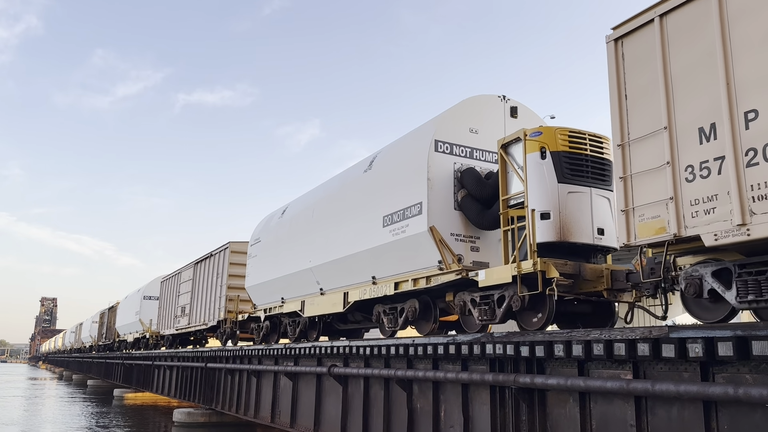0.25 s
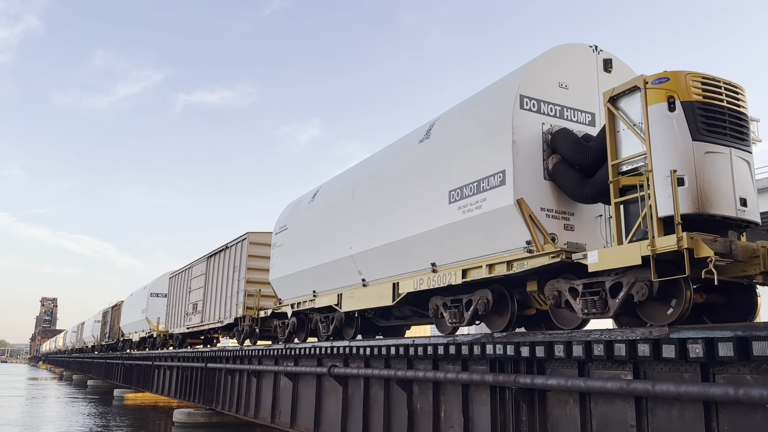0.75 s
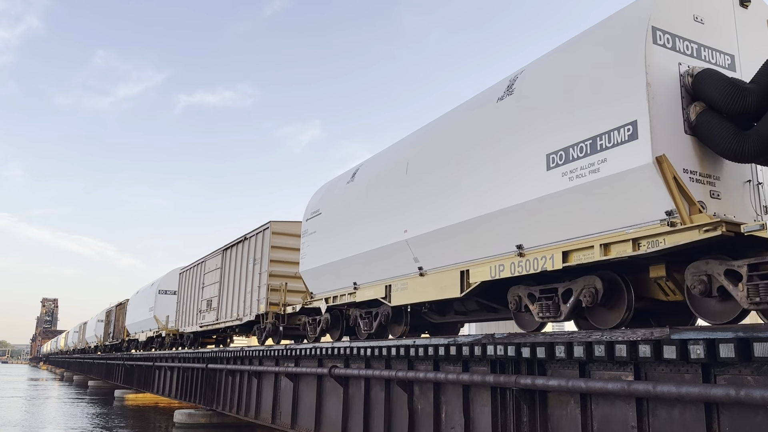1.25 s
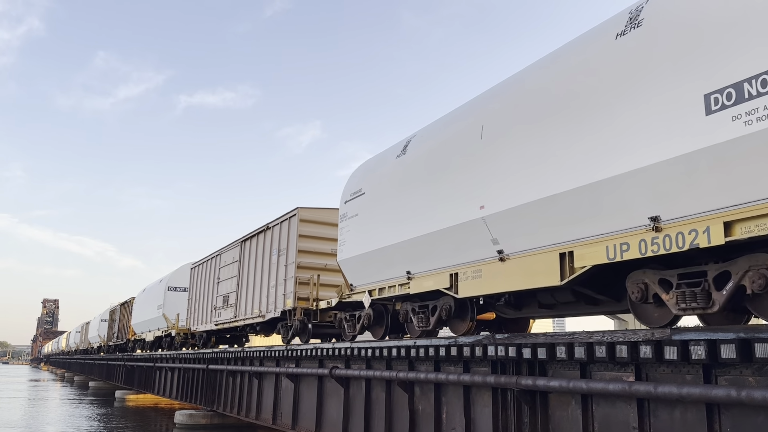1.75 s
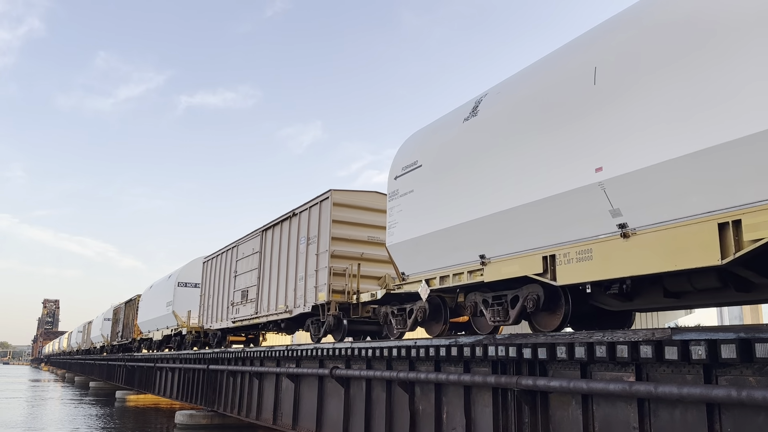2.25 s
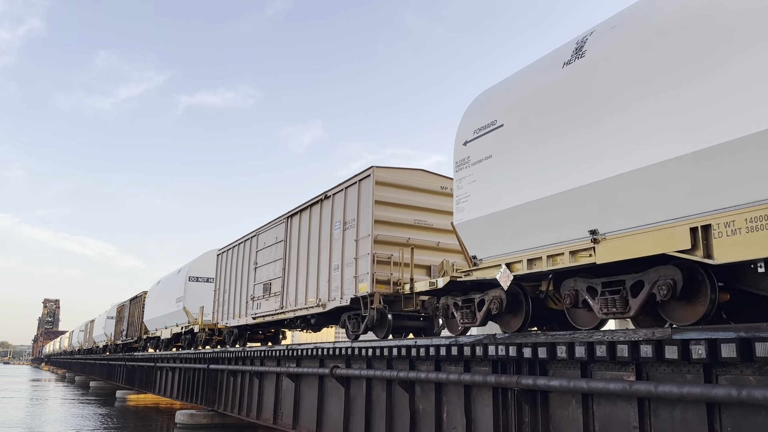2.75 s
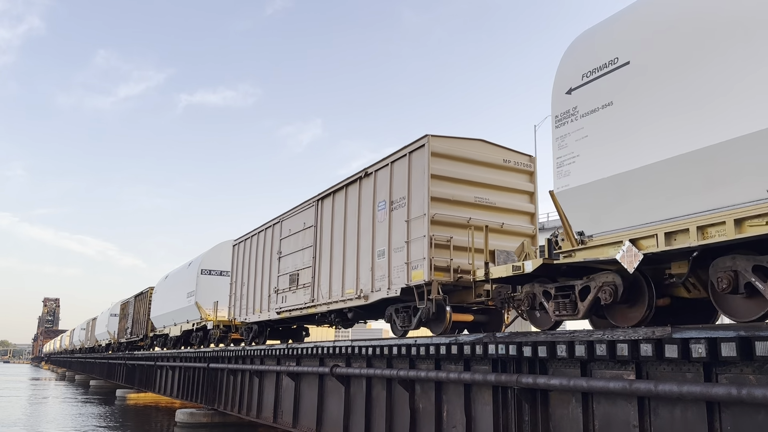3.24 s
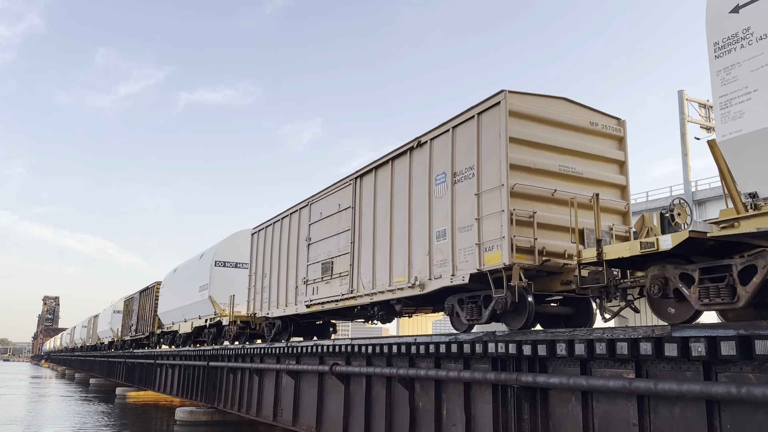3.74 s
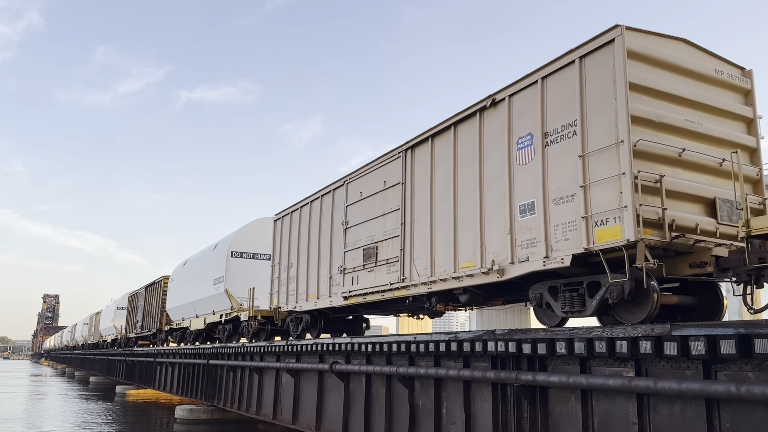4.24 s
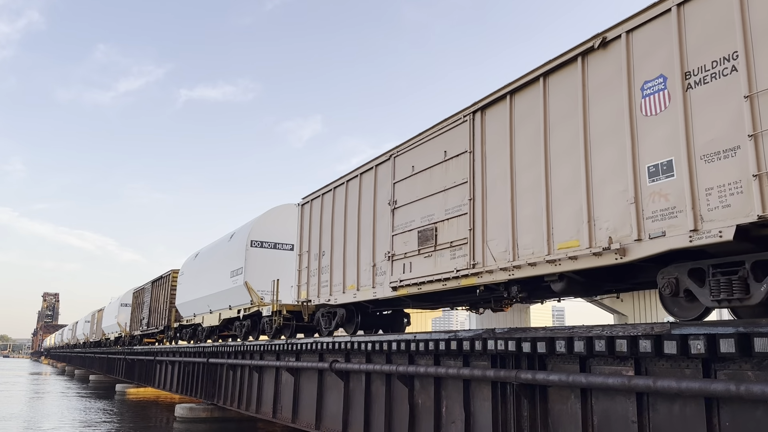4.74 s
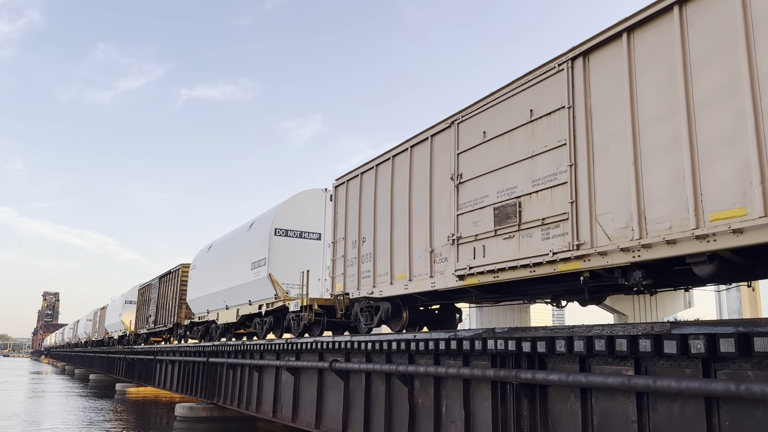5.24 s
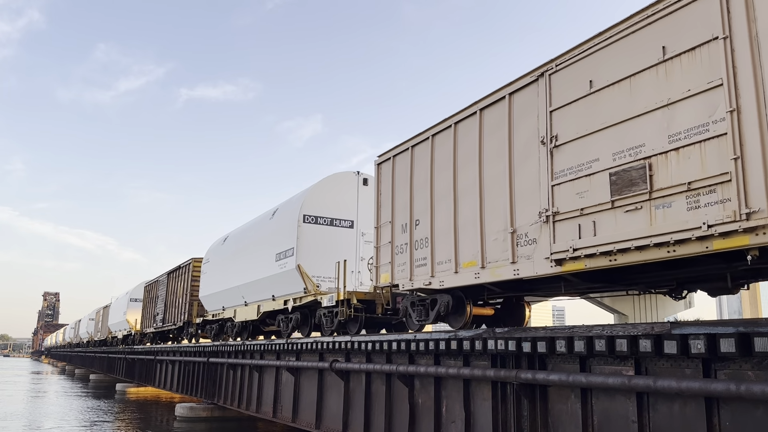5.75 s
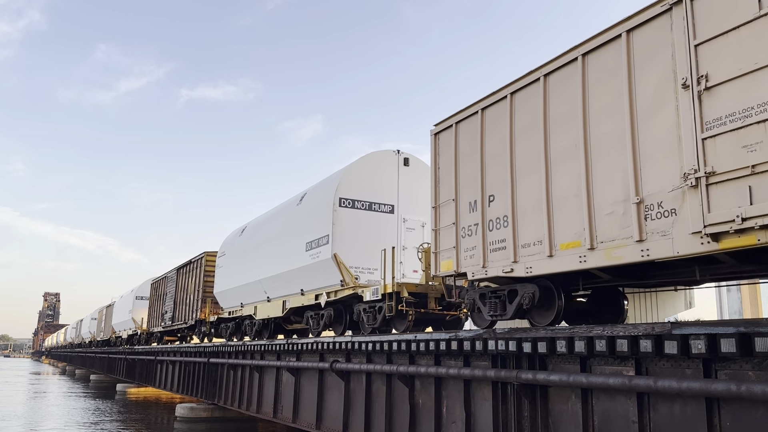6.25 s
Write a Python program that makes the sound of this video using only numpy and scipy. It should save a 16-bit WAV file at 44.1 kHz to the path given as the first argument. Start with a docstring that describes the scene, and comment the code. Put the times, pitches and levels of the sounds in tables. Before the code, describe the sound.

Outdoors beside water, just below the deck of a steel bridge, a freight train passes close to a stereo microphone. Deep girder boom swells irregularly under a continuous rough wheel roar. A hissing scrape pulses almost twice a second. Gritty flange bites and short, high ringing squeals cluster in the first two and a half seconds; later the scrape stands out more, with a few dull knocks.

```python
"""Train on a girder bridge

A freight train rolls across a steel girder bridge, heard from the bank just below the deck.
Filtered noise makes the boom of the girders, its swells and the dull knocks; filtered random impacts
make the roar of rough treads, the hum of wheel webs, a steady hiss and a scrape once a turn.
Flange bites add grit and drive decaying modes of the wheel disc; brief wavering sines squeal."""
import sys
import numpy as np
from scipy import signal
from scipy.fft import rfft, irfft, next_fast_len
from scipy.io import wavfile
from scipy.ndimage import uniform_filter1d, map_coordinates

SR = 44100
rng = np.random.default_rng(int(sys.argv[2]) if len(sys.argv) > 2 else 0)


def dump(signal):
    """Clip the signal to [-1, 1] and save it as 16-bit WAV at the path in sys.argv[1]."""
    limited = np.clip(np.atleast_2d(signal).T, -1, 1)
    pcm = np.round(limited * 32767).astype(np.int16)
    wavfile.write(sys.argv[1], SR, pcm)


N = 286201
TIME = np.arange(N) / SR
# frequency grid in Hz, kept above zero for logarithms, with room for ringing after the end
HZ = np.maximum(np.fft.rfftfreq(next_fast_len(N + SR // 10, True), 1 / SR), 1)

# All levels in the tables are relative; each spectrum is scaled to unit power when used.
# Passage of the nearest bogies: t/s, lag of the left/ms, left over right/dB
BOGIE_PASSAGE = [(0, -0.054, 0.5), (2.9, -0.024, 0.15), (3.7, 0.1, 0.1), (4.9, 0.31, 0.6),
                 (6.49, 0.37, 1.1)]
# Slow change as the cars go by: t/s, steady girder boom level/dB, deck rumble level/dB
BRIDGE_LOAD = [(0, -14.5, -16), (.7, -11.5, -14.5), (2.3, -13, -14), (3.2, -15, -14), (4.7, -15.5, -14.5),
               (5.8, -18, -17), (6.49, -17, -17)]
# Swells of the low boom: t of crest/s, level/dB, width at half power/s
BOOM_SWELLS = [(0.166, -6.5, 0.067), (.28, -5, 0.065), (0.755, -16, 0.037), (0.823, -11, 0.022),
               (0.907, -6.5, 0.042), (1.143, -7.5, .06), (1.24, -9, .04), (1.307, -8, .035),
               (1.506, -6.5, 0.05), (1.797, -7, 0.055), (2.097, -7.5, 0.13), (2.264, -8.5, .05),
               (2.438, -8, 0.097), (2.616, -7.5, 0.045), (2.722, -7.5, 0.046), (2.92, -13, .04),
               (3.018, -18, 0.04), (3.53, -11, .06), (3.61, -7.5, 0.044), (3.992, -11, .08),
               (4.1, -10, .045), (4.33, -8, .055), (4.42, -10, 0.039), (4.568, -12, 0.06),
               (4.807, -10.5, .05), (5, -12, 0.055), (5.16, -7, 0.036), (5.375, -9.5, 0.038),
               (5.484, -5, 0.037), (5.596, -6, .04), (6.022, -7, 0.031), (6.153, -9, .045),
               (6.235, -9.5, 0.026), (6.48, -8.5, .06)]
# Turns of the scraping wheel: start t/s, rise/s, scrape level/dB, sizzle level/dB, tread roar level/dB
WHEEL_TURNS = [(-.1, 0.083, -37, -39, -26.5), (.44, 0.17, -36, -36, -25), (.925, 0.14, -37, -36.5, -27),
               (1.53, 0.05, -34.5, -33.5, -25), (2.04, 0.12, -33, -34, -23), (2.56, 0.14, -34, -36, -21),
               (3.122, 0.058, -32, -35, -23), (3.663, 0.031, -31.5, -34, -22),
               (4.194, .08, -33, -37.5, -23.5), (4.713, 0.13, -34, -38.5, -21.5),
               (5.288, 0.13, -34.5, -42, -25), (5.83, 0.17, -34.5, -49.5, -31.5),
               (6.39, 0.2, -30, -31, -28)]
# How clearly this wheel stands out of the train's noise: t/s, share of the full dip [0 to 1]
PROMINENCE = [(0, 0.5), (.95, 0.41), (1.5, 0.62), (3.1, 0.92), (4.7, 0.69), (6.49, 0.72)]
# Two resonances of the passing wheel webs: t/s, lower hum level/dB, upper hum level/dB
WEB_HUM = [(0, -38, -42), (1.2, -38, -42), (2.4, -34, -42), (3.9, -33, -40), (5.5, -38, -35.5),
           (6.49, -37.5, -42)]
# Brief rasps of the wheel webs: t of crest/s, lift of the lower hum/dB, lift of the upper hum/dB
WEB_RASPS = [(2.23, 5, -8), (2.36, 6, 1), (2.86, 6, 6), (5.55, 4, 7.5), (5.9, 5, 2), (6.09, 4, 7)]
# Slow level of the highest hiss: t/s, level against sizzle/dB
HISS_LEVEL = [(0, -26), (.7, -19), (2.2, -13), (3, -9.5), (4.9, -9.5), (5.9, -17), (6.49, -16)]
# Background hiss near 3 kHz through the whole passage: t/s, level/dB
BACKGROUND_HISS = [(0, -35.5), (1.3, -38.5), (2.3, -35), (3.2, -38), (5, -47), (6.49, -37.5)]
# Flange bites: start t/s, grit level/dB, drive of the high modes/dB, drive of the low modes/dB
FLANGE_BITES = [(0.622, -21, -29, -33), (0.655, -23, -36, -44), (0.688, -14.5, -35, -32),
                (0.918, -29, -37, -35), (0.9614, -23, -35, -42), (1.098, -20.5, -35, -44),
                (1.1444, -26, -39, -43), (1.19, -29, -36, -43), (1.287, -32, -34, -53),
                (1.41, -24, -47, -55), (1.556, -14.5, -30, -35), (1.59, -19, -38, -42),
                (1.69, -15.5, -40, -46), (1.9, -24, -36, -55), (2.147, -33, -46, -44),
                (2.245, -21, -30, -48), (2.29, -22, -37, -44), (2.33, -20, -35, -42),
                (2.777, -19, -41, -45), (4.46, -23, -45, -37), (4.95, -25, -53, -41),
                (6.363, -28, -48, -60), (6.42, -31, -53, -37)]
# Modes of the wheel disc: f/Hz, level/dB, time to decay by 60 dB/s
DISC_MODES = [(1735, 0, .4), (4716, -6.5, .45), (5518, -4, .45), (6352, -1, .5), (6860, -9, .3),
              (7252, -5, .18), (8187, -3, .2), (9160, -7.5, .12), (10155, -6, .18), (10390, -12, .15),
              (11241, -13, .22), (12383, -16.5, .17), (13595, -19, .1), (14798, -14.5, .12)]
# Squealing tones: start t/s, f/Hz, level/dB, time before the decay/s
SQUEAL_TONES = [(.64, 7252, -35, .02), (.685, 7252, -29, .03), (.685, 6352, -29, .05),
                (.69, 9160, -29, .02), (.7, 14798, -42, .03), (.72, 8187, -36, .04), (.93, 8187, -32, .065),
                (.96, 14798, -48, .05), (.965, 6352, -39, .035), (.97, 5518, -40, .05),
                (1.1, 8187, -33, .035), (1.115, 6352, -42, .02), (1.12, 10155, -43, .06),
                (1.14, 7252, -35, .03), (1.17, 5518, -38, .06), (1.17, 8187, -31, .07),
                (1.285, 8187, -40, .04), (1.415, 8187, -35, .03), (1.56, 8187, -27, .028),
                (1.575, 6352, -37, .03), (1.9, 8187, -37, .06), (2.015, 7252, -42, .022),
                (2.165, 7490, -36, .02), (2.25, 8187, -35, .04), (2.315, 7252, -34, .03),
                (2.335, 10155, -39, .03), (2.67, 8187, -43, .03), (4.09, 6800, -42, .03),
                (4.378, 10290, -45, .025), (4.44, 10290, -36, .035), (5.012, 10250, -45, .025),
                (6.228, 8480, -45, .02), (6.29, 9170, -48, .12), (6.425, 8187, -44, .03)]
# Dull knocks of wheels on the track: t/s, level/dB
TRACK_KNOCKS = [(3.054, -19), (4.579, -17), (4.922, -19), (5.37, -18.5)]

# Spectrum of the lowest girder resonance: f/Hz, level per Hz/dB
GIRDER_SPECTRUM = [(15, -47), (30, -40), (40, -16), (48, -4.5), (55, 7), (61, 7.5), (67, -0.5), (76, -11.5),
                   (110, -36)]
# Spectrum of the deck plates: f/Hz, level per Hz/dB
DECK_SPECTRUM = [(50, -18), (68, 2), (80, -1), (105, 0), (122, -4), (145, -2.5), (200, -7), (225, -10.5),
                 (300, -13), (380, -15), (550, -24.5), (1200, -34)]
# Spectrum of rough treads on the rail: f/Hz, level per Hz/dB
TREAD_SPECTRUM = [(150, -4), (260, 5.5), (360, 5), (460, -0.5), (650, 0.5), (900, -7), (1120, -7.5),
                  (1300, -15), (1700, -15.5), (2300, -34), (3800, -48)]
# Spectrum of the lower web resonance: f/Hz, level per Hz/dB
LOWER_WEB_SPECTRUM = [(1200, -16.5), (1450, -2), (1720, 1), (1950, -1), (2200, -23)]
# Spectrum of the upper web resonance: f/Hz, level per Hz/dB
UPPER_WEB_SPECTRUM = [(1750, -22), (2050, 0.5), (2270, -1), (2500, -4.5), (2800, -10.5), (3300, -28)]
# Spectrum of the scraping wheel: f/Hz, level per Hz/dB
SCRAPE_SPECTRUM = [(1200, 4), (1800, 3.5), (2700, 1), (3700, 3), (4700, 4), (5500, 5), (6200, 1), (7200, 1),
                   (9000, -9.5), (10300, -21), (11300, -41), (16000, -26)]
# Spectrum of the sizzle: f/Hz, level per Hz/dB
SIZZLE_SPECTRUM = [(4000, -15), (6500, -17.5), (7500, -4), (8500, -3.5), (9200, 1), (10100, -4.5),
                   (10900, -12.5), (12200, -25), (14300, -16), (15700, -27)]
# Spectrum of the highest hiss: f/Hz, level per Hz/dB
TOP_HISS_SPECTRUM = [(10000, -20), (11200, 1), (12500, -1), (14000, -5), (15700, -5)]
# Spectrum of the rail hiss near 3 kHz: f/Hz, level per Hz/dB
RAIL_SPECTRUM = [(2200, -7.5), (2600, -2), (2900, -5), (3300, -3.5), (3700, -21)]
# Spectrum of the flange grinding on the rail head: f/Hz, level per Hz/dB
BITE_SPECTRUM = [(3500, -32), (6000, -1), (7300, 10), (8300, 13), (9400, 13.5), (10800, 7.5), (12500, -3),
                 (14800, 2), (16000, -7)]
# Spectrum of a knock: f/Hz, level per Hz/dB
KNOCK_SPECTRUM = [(150, -6), (330, 7), (650, -5), (1100, -14), (2000, -19), (3000, -21)]
# Likeness of left and right: f/Hz, correlation [0 to 1]
LIKENESS = [(80, 1), (200, 0.965), (600, 0.82), (1300, 0.62), (2300, 0.36), (4500, 0.32), (6000, 0.22),
            (7200, 0.65), (8300, 0.9), (11500, 1), (15000, 1)]
# Microphone ports: f/Hz, left level/dB, right level/dB, phase lag of the right/rad
PORTS = [(60, 0.5, -0.5, 0), (200, 0.8, -0.5, 0), (600, 0.8, 1.1, 0), (1300, 1.6, 2.0, 0),
         (2300, 0.9, 4.4, 1.8), (3200, 3.9, 0.5, 1.0), (4500, 4.4, -2.3, 1.0), (6000, 6.0, -4.2, 2.2),
         (7200, 6.4, 0.2, 2.0), (8300, 8.2, 4.6, 2.3), (9700, 2.4, 1.7, 1.3), (11500, -0.0, 0.0, 0.0),
         (15000, 3.3, 3.3, -1.7)]

PLATE_RIPPLE_DB, PLATE_MODE_HZ = 1.3, 22   # spread and spacing of the plate modes
RELEASE_AFTER_S, RELEASE_S = 0.32, 0.18   # the wheel bears on this long in each turn, then eases off
EASING = 1.1   # exponent; above 1 rounds the shoulders of each swell
# full dip of each sound while the wheel is eased off, before its prominence is applied
SCRAPE_DIP_DB, SIZZLE_DIP_DB, ROAR_DIP_DB = 10.5, 13, 7
DECK_DIP_DB, WEB_DIP_DB, RAIL_DIP_DB = 2, 8.5, 7.5
RASP_S = 0.033   # width of a rasp at half its lift in dB
RASP_DB, RASPS_PER_S = 1.44, 25   # uneven grip makes the web hum rasp
BITE_S = 0.03   # time scale on which a bite lets go
TURNS_PER_S, HZ_PER_LOBE, LOBE_DEPTH = 1.87, 650, .5   # lobes of each mode sweep past, so it beats
SQUEAL_RISE_S, SQUEAL_RING_CYCLES = .007, 1000   # a squeal dies by 60 dB in this many cycles
SQUEAL_WOBBLE_HZ, SQUEAL_FLUTTER_DB, SQUEAL_DB = 38, 2.6, -2.5   # pitch and level spread, overall gain
KNOCK_T60_S = .06
PATCH_DB, PATCH_HZ, PATCH_S = 1.3, 110, .025   # depth, width and life of a patch of resonance
CUTOFF_HZ = 16100


def from_db(db):
    """Logarithmic measure: decibels to amplitude gain."""
    return 10 ** (np.asarray(db) / 20)


def rms_one(x):
    """Normalization: scale to unit mean power."""
    return x / np.sqrt(np.mean(x ** 2) + 1e-20)


def in_time(rows):
    """Linear interpolation: the columns of a curve at every sample."""
    s, *columns = np.transpose(rows)
    return [np.interp(TIME, s, column) for column in columns]


def in_hz(rows):
    """Interpolation along log frequency: the columns of a spectrum at every frequency."""
    hz, *columns = np.transpose(rows)
    return [np.interp(np.log(HZ), np.log(hz), column) for column in columns]


def drift(rate):
    """Slow random modulation: chance values about rate times a second, joined by lines; RMS 1."""
    knots = rng.standard_normal(2048)
    return rms_one(np.interp(TIME * rate, np.arange(len(knots)), knots))


def bell(s, length):
    """Gaussian envelope: a hump of height 1 around s; length is its width at half height."""
    hump = np.zeros(N)
    near = slice(*np.searchsorted(TIME, [s - 2 * length, s + 2 * length]))
    hump[near] = .5 ** ((2 * (TIME[near] - s) / length) ** 2)
    return hump


def steady(x, span_s):
    """Envelope normalization: even out the level and keep the wandering phase."""
    analytic = signal.hilbert(x, next_fast_len(N))[:, :N]
    power = np.mean(np.abs(analytic) ** 2, axis=0) / 2
    return x / np.sqrt(np.abs(uniform_filter1d(power, max(int(span_s * SR), 1))) + 1e-12)


def padded_fft(x):
    """Fourier analysis: spectrum on the HZ grid, with room for ringing after the end."""
    return rfft(x, 2 * (len(HZ) - 1))


def contacts(per_s, spread_db):
    """Shot noise: two unrelated streams of tiny steel-on-steel impacts of uneven size."""
    sizes = from_db(spread_db * np.minimum(rng.exponential(1, (2, N)), 4))
    hits = rng.random((2, N)) < per_s / SR
    return rms_one(hits * sizes * rng.choice([-1, 1], (2, N)))


def radiate(force, spectrum):
    """Resonant radiation: a steel body colours two force streams, which are then given their stereo
    correlation."""
    alike = np.clip(in_hz(LIKENESS)[0], 0, 1)
    roll_off = np.minimum(spectrum[-1][0] / HZ, 1) ** 4
    # above the girder's few low modes, crowded plate modes leave small peaks and dips
    modes_hz = np.arange(0, SR, PLATE_MODE_HZ)
    peaks = rng.standard_normal(len(modes_hz)) * (modes_hz > 250)
    ripple_db = PLATE_RIPPLE_DB * np.interp(HZ, modes_hz, peaks)
    mid, side = padded_fft(force) * from_db(in_hz(spectrum)[0] + ripple_db) * roll_off
    stereo = np.sqrt(1 + alike) * mid + np.sqrt(1 - alike) * side * [[1], [-1]]
    return rms_one(irfft(stereo)[:, :N])


def wheel_turns():
    """Periodic contact load: once a turn the wheel bears on, holds and eases off.

    Returns slack (0 = full grip), then the scrape, sizzle and roar levels in dB."""
    starts, rises, *levels_db = np.transpose(WHEEL_TURNS)
    release_end = RELEASE_AFTER_S + RELEASE_S
    presses = []
    for s, rise in zip(starts, rises):
        ages = [0, min(rise, RELEASE_AFTER_S), RELEASE_AFTER_S, release_end]
        presses.append(np.interp(TIME - s, ages, [0, 1, 1, 0]))
    pressure = np.max(presses, axis=0)
    slack = (1 - pressure) ** EASING * in_time(PROMINENCE)[0]
    middles = starts + release_end / 2
    dips_db = SCRAPE_DIP_DB, SIZZLE_DIP_DB, ROAR_DIP_DB
    return slack, *[np.interp(TIME, middles, db) - dip_db * slack for db, dip_db in zip(levels_db, dips_db)]


def girders(gain_db, swell_db, span_s):
    """Narrow-band resonance: the girders throb in a low mode, swells adding in power to the boom."""
    boom_db, _ = in_time(BRIDGE_LOAD)
    swells = sum(from_db(db + swell_db) ** 2 * bell(s, length) for s, db, length in BOOM_SWELLS)
    level = np.sqrt(from_db(boom_db + gain_db) ** 2 + swells)
    throb = level * steady(radiate(rng.standard_normal((2, N)), GIRDER_SPECTRUM), span_s)
    return signal.sosfilt(signal.butter(3, 33, "high", fs=SR, output="sos"), throb)


def rolling(slack, roar_db, deck_gain_db, roar_gain_db, lower_gain_db, upper_gain_db):
    """Roughness excitation: rough treads shake the deck, roar from the rail and hum in the wheel webs."""
    deck_db = in_time(BRIDGE_LOAD)[1] - DECK_DIP_DB * slack
    lifts_db = sum(np.outer(db, bell(s, RASP_S)) for s, *db in WEB_RASPS)
    lower_db, upper_db = in_time(WEB_HUM) + lifts_db - WEB_DIP_DB * slack
    plates = steady(radiate(rng.standard_normal((2, N)), DECK_SPECTRUM), span_s=0.08)
    deck = from_db(deck_db + deck_gain_db) * plates
    roar = steady(radiate(contacts(per_s=5000, spread_db=2.5), TREAD_SPECTRUM), span_s=0.073)
    tread = from_db(roar_db + roar_gain_db) * roar
    lower_hum = radiate(contacts(per_s=4000, spread_db=3.0), LOWER_WEB_SPECTRUM)
    lower = from_db(lower_db + lower_gain_db) * lower_hum
    upper_hum = radiate(contacts(per_s=4000, spread_db=1.5), UPPER_WEB_SPECTRUM)
    upper = from_db(upper_db + upper_gain_db) * upper_hum
    rasp = from_db(RASP_DB * drift(RASPS_PER_S))
    left, right = deck + tread + rasp * (lower + upper)
    lag_ms, _ = in_time(BOGIE_PASSAGE)
    return np.array([np.interp(TIME - lag_ms / 1000, TIME, left), right])


def scrape(scrape_db, sizzle_db, scrape_gain_db, sizzle_gain_db, chatter_db):
    """Stick-slip friction: grains, sizzle and top hiss swell with each turn at levels of their own."""
    chatter = from_db(chatter_db * drift(120))
    grains = radiate(contacts(per_s=15000, spread_db=1.0), SCRAPE_SPECTRUM)
    body = from_db(scrape_db + scrape_gain_db) * grains
    bright = radiate(contacts(per_s=15000, spread_db=-0.5), SIZZLE_SPECTRUM)
    sizzle = from_db(sizzle_db + sizzle_gain_db) * bright
    top = radiate(contacts(per_s=5000, spread_db=-2.0), TOP_HISS_SPECTRUM)
    hiss = from_db(sizzle_db + sizzle_gain_db + in_time(HISS_LEVEL)[0]) * top
    return chatter * (body + sizzle + hiss)


def rail(slack):
    """Structure-borne sound: rolling contact carried along the rail as a narrow background hiss."""
    level_db, = in_time(BACKGROUND_HISS)
    hiss = radiate(contacts(per_s=8000, spread_db=3.5), RAIL_SPECTRUM)
    return from_db(level_db - RAIL_DIP_DB * slack) * hiss


def bite_force(levels_db, rise_s):
    """Transient friction: each bite grips quickly and soon lets go."""
    force = np.zeros(N)
    for (s, *_), level_db in zip(FLANGE_BITES, levels_db):
        span = slice(int(s * SR), int(s * SR) + SR // 4)
        age = np.maximum(TIME[span] - s, 0)
        force[span] += from_db(level_db) * (1 - np.exp(-age / rise_s)) * np.exp(-(age / BITE_S) ** 2)
    return force


def flange(sizzle_db, grit_db, ring_db, rub_ring_db):
    """Modal excitation: flange bites grind, and with the rubbing feed wheel modes that ring on after."""
    _, bite_db, high_db, low_db = np.transpose(FLANGE_BITES)
    grit = radiate(contacts(per_s=8000, spread_db=1.0), BITE_SPECTRUM)
    out = from_db(grit_db) * bite_force(bite_db, rise_s=0.008) * grit
    rubbing = from_db(sizzle_db + rub_ring_db)
    for hz, level_db, t60 in DISC_MODES:
        # the point of contact decides whether the high or the low modes take up a bite
        strength_db = (high_db if hz > 7000 else low_db) + rng.normal(0, 2.5, len(FLANGE_BITES))
        drive = bite_force(strength_db + ring_db, rise_s=0.0011) + rubbing
        keep = from_db(-60 / (t60 * SR))   # amplitude kept from one sample to the next
        swell = signal.lfilter([1 - keep], [1, -keep], drive)
        # friction jostles level and phase, the phase more so in well damped modes
        flutter_db = 2.0 * drift(60)
        jostle = np.cumsum(rng.standard_normal(N)) * np.sqrt(2 * np.log(1000) / (t60 * SR))
        lobe_hz = round(hz / HZ_PER_LOBE) * TURNS_PER_S
        lobes = 1 + LOBE_DEPTH * np.sin(2 * np.pi * (lobe_hz * TIME + rng.random()))
        tone = np.sin(2 * np.pi * hz * TIME + jostle)
        out = out + from_db(level_db + flutter_db) * lobes * swell * tone
    return out


def squeals():
    """Self-excited oscillation: a slipping wheel locks onto wavering tones, which build and ring out."""
    out = np.zeros(N)
    wobble = SQUEAL_WOBBLE_HZ * drift(300)
    flutter = from_db(SQUEAL_DB + SQUEAL_FLUTTER_DB * drift(200))
    for s, hz, db, length in SQUEAL_TONES:
        span = slice(int(s * SR), int(s * SR) + SR // 2)
        age = np.maximum(TIME[span] - s, 0)
        fade_db = 60 * np.maximum(age - length, 0) * hz / SQUEAL_RING_CYCLES
        level = from_db(db - fade_db) * (1 - np.exp(-age / SQUEAL_RISE_S)) * flutter[span]
        out[span] += level * np.sin(2 * np.pi * np.cumsum(hz + wobble[span]) / SR)
    return out


def knocks():
    """Impact and damping: a wheel drops onto the rail and jolts the deck, which quickly falls quiet."""
    level = np.zeros(N)
    for s, db in TRACK_KNOCKS:
        span = slice(int(s * SR), int(s * SR) + SR // 2)
        level[span] += from_db(db - 60 * (TIME[span] - s) / KNOCK_T60_S)
    return level * radiate(rng.standard_normal((2, N)), KNOCK_SPECTRUM)


def wander(x):
    """Time-varying resonance: moving contacts make narrow patches of the sound swell and fade."""
    hz, s, bands = signal.stft(x, SR, nperseg=1024)
    chance = rng.standard_normal((256, 256))
    places = np.meshgrid(hz / PATCH_HZ, s / PATCH_S, indexing="ij")
    patches = map_coordinates(chance, places, order=2, mode="mirror")
    gain = from_db(PATCH_DB * patches * np.minimum(hz / 300, 1)[:, None])   # shallower below 300 Hz
    gain = gain / np.sqrt(np.mean(gain ** 2, axis=1, keepdims=True))
    return signal.istft(bands * gain, SR)[1][:, :N]


def scene():
    """Superposition: bridge and rolling wheels, weighted left against right, join the friction sounds."""
    _, pan_db = in_time(BOGIE_PASSAGE)
    pan = from_db(pan_db / 2 * [[1], [-1]])
    slack, scrape_db, sizzle_db, roar_db = wheel_turns()
    bridge = girders(gain_db=-1.7, swell_db=-1.66, span_s=0.065)
    wheels = rolling(slack, roar_db, deck_gain_db=0.57, roar_gain_db=2.5,
                     lower_gain_db=0.3, upper_gain_db=0.3)
    rubbing = scrape(scrape_db, sizzle_db, scrape_gain_db=1.3, sizzle_gain_db=-1.4, chatter_db=0.7)
    background = rail(slack)
    grinding = flange(sizzle_db, grit_db=-10.2, ring_db=0.5, rub_ring_db=-20.5)
    moving = wander(wheels * pan + background + rubbing + grinding)
    return moving + squeals() + (bridge + knocks()) * pan


def record(dry):
    """Linear reception, then saturation: two ports colour the sides, peaks are rounded, the top is cut."""
    left_db, right_db, lag = in_hz(PORTS)
    soft_ends = np.minimum(np.minimum(TIME, TIME[::-1]) / .003, 1)   # 3 ms fades
    ports = np.array([from_db(left_db), from_db(right_db) * np.exp(-1j * lag)])
    heard = irfft(padded_fft(dry * soft_ends) * ports)[:, :N]
    ceiling = .98
    rounded = heard / (1 + (heard / ceiling) ** 6) ** (1 / 6)
    return signal.sosfilt(signal.cheby2(24, 70, CUTOFF_HZ, fs=SR, output="sos"), rounded)


dry = scene()
out = record(dry)
dump(out)
```